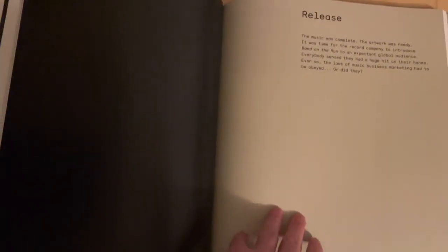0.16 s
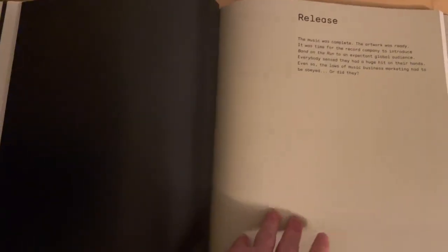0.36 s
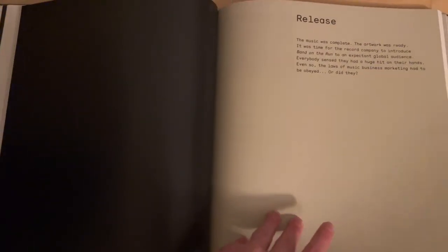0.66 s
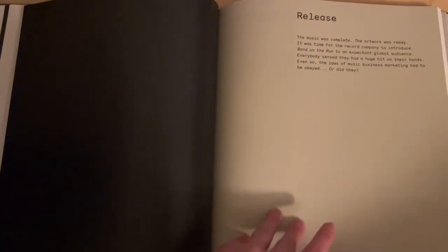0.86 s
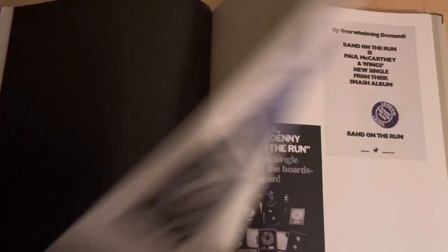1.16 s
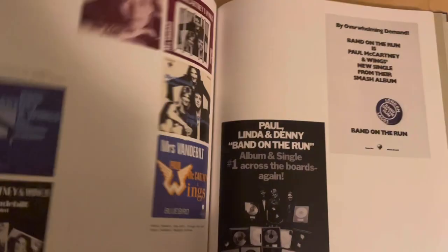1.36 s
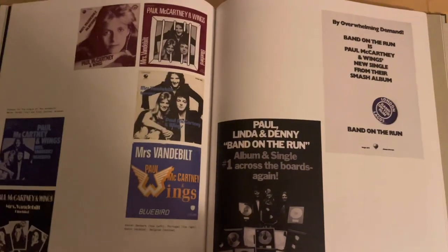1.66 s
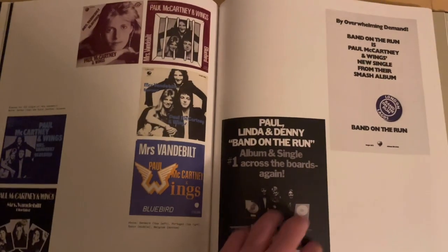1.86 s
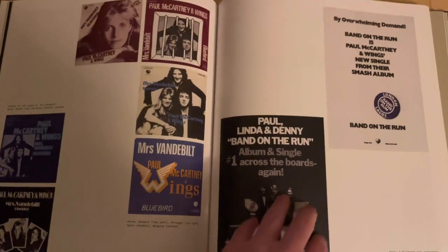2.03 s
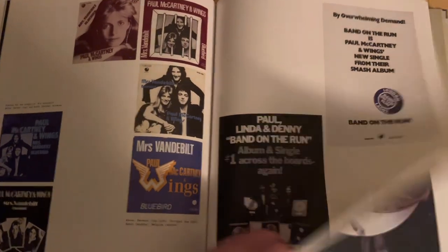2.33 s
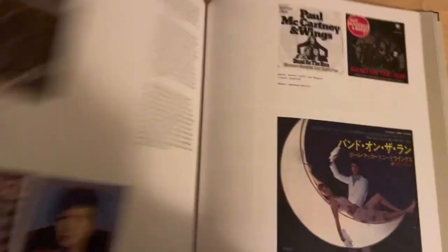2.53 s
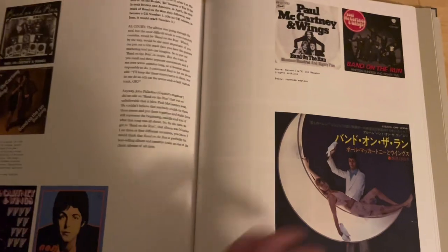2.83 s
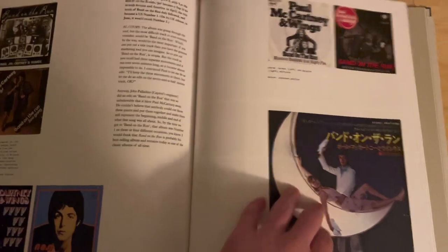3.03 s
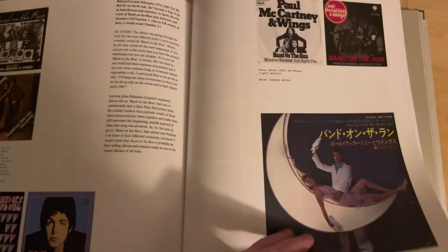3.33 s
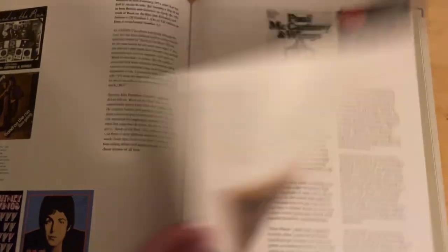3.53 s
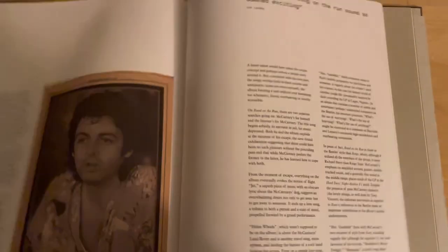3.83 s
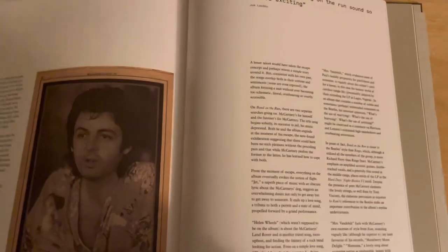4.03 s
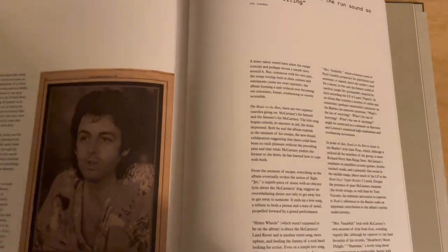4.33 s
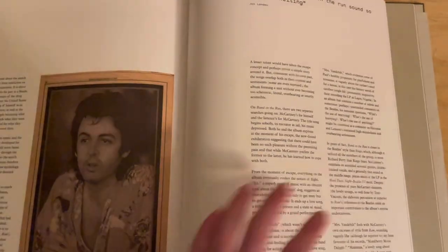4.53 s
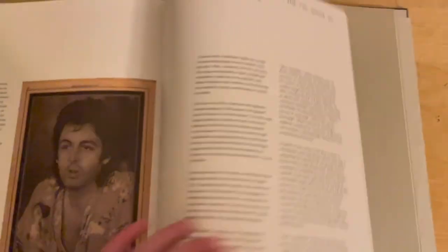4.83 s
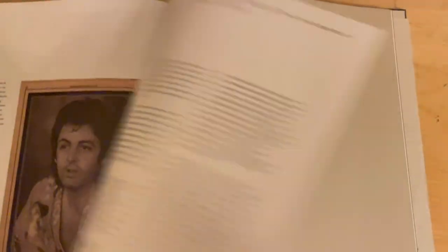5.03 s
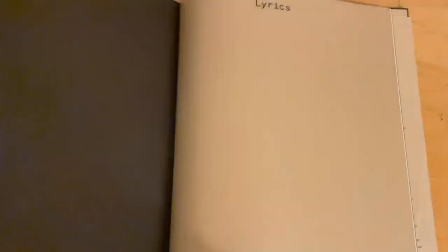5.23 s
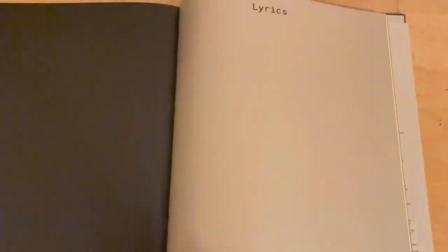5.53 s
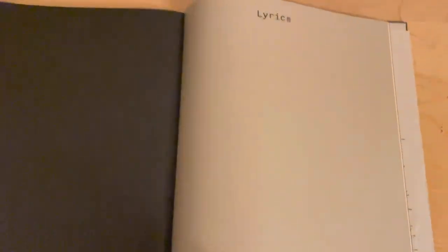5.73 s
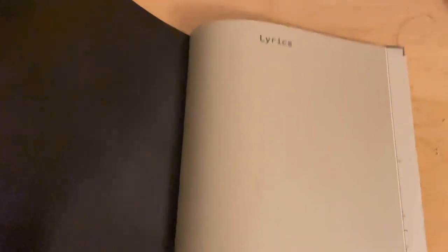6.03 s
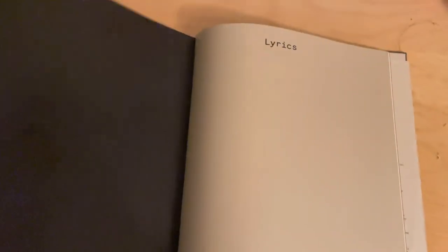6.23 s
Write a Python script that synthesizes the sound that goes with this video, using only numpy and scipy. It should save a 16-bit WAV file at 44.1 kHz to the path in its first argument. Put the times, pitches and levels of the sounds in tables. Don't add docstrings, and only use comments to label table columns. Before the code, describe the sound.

Close indoor page turning: thick paper hisses and scrapes, flutters, snaps and lands dully, with a sharp edge flick and quiet pauses between.

```python
import sys
import numpy as np
from scipy import signal
from scipy.fft import rfft, irfft, next_fast_len
from scipy.io import wavfile
from scipy.ndimage import uniform_filter1d, map_coordinates

SR = 44100
rng = np.random.default_rng(int(sys.argv[2]) if len(sys.argv) > 2 else 0)


def gain_from_db(level_db):
    decades = np.asarray(level_db, float) / 20
    return 10 ** decades


def digitize_waveform(pressure):
    field = np.atleast_2d(pressure).T
    bounded = np.clip(field, -1, 1)
    quanta = np.round(bounded * 32767).astype(np.int16)
    wavfile.write(sys.argv[1], SR, quanta)


N = 281358

# [f/Hz, density level/dB]
AIR_COLOUR = [(15, -41.5), (30, -1.5), (87, -1), (240, -17), (600, -27), (5880, -40), (10400, -41.5),
              (16000, -54)]
TABLE_COLOUR = [(12, -58.5), (20, -14.5), (49, 0), (123, 0.5), (140, 4.5), (173, -8), (260, -13),
                (340, -32.5), (570, -120)]
HISS_COLOUR = [(1500, -33.5), (2800, -7.5), (4000, -2.5), (7000, -2.5), (11000, -10), (14300, -22),
               (15500, -26.5), (16000, -34.5)]
SCRAPE_COLOUR = [(500, -27), (1100, -3), (2000, -0.8), (3200, -3), (6000, -40)]
CRACK_COLOUR = [(700, -31), (1500, -1), (2500, 1), (5000, -4.5), (7500, -2), (10000, -9.5), (13000, -16),
                (16000, -22)]
FLUTTER_COLOUR = [(150, -27), (280, 5.5), (1400, -6), (2400, -26)]
# [f/Hz, likeness -1..1]
AIR_ALIKE = [(60, 0.9), (290, 1), (640, -0.37), (3100, 0.3), (6820, -0.99), (15000, 0.51)]
GLOSS_ALIKE = [(2000, .8), (5500, .88), (7000, .92), (9000, .95), (11000, .9), (14000, .97)]
TABLE_ALIKE, SCRAPE_ALIKE, FLUTTER_ALIKE = [(60, 0.92)], [(1000, 0.5)], [(300, 0.8)]
# [f/Hz, lead/rad]
PORT_LEAD = [(0, 0), (3000, .3), (5100, -.1), (6000, -1.4), (7000, -2.6), (7800, -3.14), (8600, -3.8),
             (9900, -6), (12300, -6.5), (13000, -9.2), (14600, -9.5), (15100, -9.5), (15800, -10.4)]
# [f/Hz, t60/s]
ROOM_T60 = [(150, 0.21), (1000, 0.15), (4000, 0.19), (12000, 0.11)]
# [f/Hz, width/Hz, level/dB]
BLOCK_NOTES = [(1453, 160, 2.5), (2336, 270, -16)]
# [t/s, left over right level/dB]
LEAN = [(0, 0), (1.2, 2), (1.5, 4.5), (2.4, 4), (3.8, 4.5), (4.6, 1), (5.3, 5.5), (6.38, 4.5)]

# [peak t/s, level/dB, swell/s, fade/s]
PRESSES = [(0.0, -59.5, .05, 0.052), (.307, -61, 0.072, 0.077), (0.595, -51.5, 0.021, 0.15),
           (.76, -47, 0.13, 0.078), (.893, -58, 0.12, 0.33), (1.248, -57, 0.27, 0.12),
           (1.382, -56, .054, .2), (1.519, -42.5, 0.064, 0.072), (1.714, -47.5, 0.095, 0.14),
           (2.2, -50, 0.026, 0.13), (2.31, -51.5, 0.069, 0.078), (2.522, -46, 0.02, 0.15),
           (2.577, -48, 0.12, .115), (3.05, -50, 0.047, 0.065), (3.226, -50.5, 0.0068, 0.099),
           (3.552, -51.5, 0.038, 0.21), (3.689, -44.5, 0.043, 0.11), (3.814, -40.5, 0.04, 0.13),
           (4.2, -62, 0.085, 0.31), (4.65, -65, 0.17, 0.41), (5.068, -54, .05, 0.088),
           (5.23, -45, 0.046, 0.11), (5.323, -37, 0.1, 0.061), (5.44, -55, 0.12, 0.09),
           (5.83, -58, 0.021, .15), (5.939, -55, .06, 0.07), (6.107, -45.5, .06, 0.22),
           (6.173, -45, .1, 0.16), (6.378, -44.5, .07, 0.11)]
# [peak t/s, hiss level/dB, scrape over hiss/dB, swell/s, fade/s]
SLIDES = [(0.308, -74, 3, 0.048, 0.031), (.731, -60.5, 0, 0.042, .085), (.86, -73.5, 5, .03, .15),
          (.975, -57, -1.5, 0.091, 0.13), (1.206, -60.5, 4.5, 0.32, 0.12), (1.39, -69, -2, .3, 0.25),
          (1.494, -54, 4, 0.049, 0.17), (1.579, -54.5, -9.5, 0.19, 0.073), (1.97, -66.5, -0.5, .12, 0.048),
          (1.87, -62, -0.5, 0.11, 0.075), (2.061, -65.5, 1, 0.018, 1), (2.479, -59.5, -0.9, 0.32, 0.12),
          (2.579, -59, 7.5, 0.32, 0.064), (2.784, -56, -8, 0.24, 0.12), (3.03, -62, 0, 0.026, 0.21),
          (3.12, -64, 3, .06, .1), (3.239, -56.5, -0.5, 0.15, 0.071), (3.375, -58.5, -1, 0.07, 0.3),
          (3.526, -52.5, -2, 0.085, .16), (3.67, -51, -4, 0.11, 0.17), (4.051, -66, 6, 0.46, 0.049),
          (4.29, -62, -1, 0.4, 0.057), (4.393, -69, -2.5, .2, 0.055), (5.1, -67.5, 2, .4, 0.11),
          (5.2, -68, -2, .015, .2), (6.32, -80, 16, 0.11, 0.43)]
# [t/s, hiss level/dB, scrape over hiss/dB, fade/s]
SKIDS = [(0.0, -75, -3, 0.145), (.68, -53.5, 5, 0.072), (1.703, -53.5, 1, 0.17), (2.182, -59, 18, 0.19),
         (2.517, -49.5, 7.5, 0.084), (3.798, -47.5, 14, 0.13), (4.598, -54.5, -7, 0.12),
         (4.74, -65.5, -4.5, 0.14), (5.272, -60, -8.5, 0.1), (5.325, -63, -13, 0.033),
         (5.819, -81, 8.5, 0.32), (6.06, -82.5, 19.5, 0.11), (6.124, -68.5, 17.5, 0.13)]
# start t/s, length/s, hiss level/dB, scrape over hiss/dB, pointedness
SWIPE = (4.59, 0.1638, -45, -7, 1.8)
# [peak t/s, level/dB, note f/Hz, swell/s, fade/s]
SWEEPS = [(0.0, -55.5, 460, .02, 0.026), (.75, -53, 650, .08, 0.021), (1.05, -58.5, 700, .5, 0.54),
          (1.2, -56, 900, .11, 0.029), (1.87, -61, 686, .4, 0.077), (2.09, -63, 573, .125, 0.063),
          (2.188, -38.5, 700, .022, 0.083), (2.56, -38, 450, 0.1, 0.1), (2.775, -60, 1080, .3, 0.027),
          (3.038, -59.5, 490, .083, 0.16), (3.225, -52.5, 740, .015, 0.17), (3.552, -51.5, 700, .14, 0.21),
          (3.69, -42, 600, 0.026, 0.07), (3.95, -61, 716, .2, 0.41), (4.269, -56.5, 916, .3, 0.12),
          (4.62, -65.5, 520, .04, .4), (4.925, -60, 720, 0.18, 0.163), (5.066, -53.5, 797, .13, 0.057),
          (5.93, -65, 594, .3, 0.057), (6.3, -57.5, 510, .3, 0.17), (6.378, -49, 564, .05, .1)]
# [t/s, length/s, level/dB, start f/Hz, end f/Hz]
WEDGES = [
    (2.6, .09, -48, 520, 470),
    (2.63, .11, -59, 1000, 1150),
    (2.74, .06, -57, 950, 1150),
    (2.68, .2, -65, 4100, 4800),
    (2.65, .2, -66, 2600, 2400),
    (4.81, .06, -64, 800, 700),
    (4.885, .12, -60, 800, 620),
    (4.91, .08, -71, 2050, 2000),
    (4.89, .09, -73, 4800, 5100),
    (5.03, .1, -71, 6000, 5000),
]
# [t/s, length/s, level/dB, start f/Hz, end f/Hz]
GAPS = [
    (4.81, .07, -71, 3000, 4000),
    (4.885, .06, -69, 3600, 3400),
    (5.04, .1, -66, 2000, 2200),
    (5.32, .11, -58, 1700, 1400),
    (6.255, .16, -65, 3200, 4400),
]
# [peak t/s, level/dB, start f/Hz, end f/Hz, swell/s, t60/s]
SQUEAKS = [
    (1.2, -33.5, 780, 1000, 0.013, 0.0087),
    (5.41, -68, 3730, 3480, .004, 0.018),
]
# [peak t/s, level/dB, swell/s, resonances [f/Hz, width/Hz, level/dB]]
FLICKS = [
    (2.1784, -17.5, 0.0017, [(1090, 150, -13.5), (1454, 44, -9.5), (2197, 330, 3.5), (2713, 51, -8.5), (3950, 270, -20.5), (4807, 160, -6.5), (5400, 150, -17.5), (6370, 180, -11), (6710, 150, -24.5), (7520, 160, -15)]),
    (3.2265, -39, 0.0035, [(623, 41, -5), (1704, 70, 5.5), (2070, 210, 3), (1060, 82, -6.5)]),
]
# [t/s its note
# arrives, peak level/dB, note f/Hz, spread/s]
WHIPS = [(.98, -56, 3000, .001), (1.476, -41, 800, .006), (1.75, -54, 3000, .001), (2.483, -44, 560, .008),
         (2.497, -47, 190, .02), (2.518, -27, 700, .004), (2.601, -32, 520, .006), (2.621, -40, 480, .01),
         (2.641, -42, 500, .01), (2.675, -42, 900, .006), (2.766, -46, 1150, .004), (3.05, -47, 140, .03),
         (3.542, -46, 330, .01), (3.68, -31, 650, .008), (3.687, -30, 270, .014), (3.8, -26, 300, .008),
         (3.796, -18, 620, .005), (3.808, -29, 1100, .005), (5.063, -45, 1500, .003),
         (5.263, -34, 520, .006), (5.268, -38, 2200, .002), (5.275, -21, 800, .005),
         (5.318, -24, 700, .004), (5.321, -34, 1500, .002), (6.144, -22, 800, .003),
         (6.212, -58, 4200, .001), (6.263, -50, 600, .004), (6.367, -31, 620, .01)]
# [t/s, peak level/dB, sheet note f/Hz, crack over peak/dB]
RIFFLES = [(.292, -51.5, 626, -15.5), (.495, -62, 530, -23), (.775, -56, 495, -18), (.851, -46, 495, -8),
           (.879, -45, 560, -11), (1.201, -33.5, 1180, -12.5), (1.486, -35.5, 570, -8.5),
           (1.505, -31.5, 444, -42), (1.696, -38.5, 488, -14.5), (2.284, -50, 390, -.5),
           (2.479, -54, 640, -14), (2.747, -48, 1000, -9.5), (4.169, -50, 760, -7.5),
           (5.062, -47, 1004, -24), (5.313, -31, 650, -30), (5.817, -43, 527, -20.5),
           (5.853, -47.5, 570, -19.5), (5.878, -46, 593, -22), (6.039, -49, 573, -31.5),
           (6.055, -44.5, 613, -32), (6.066, -43, 533, -30), (6.082, -38, 610, -27), (6.113, -34, 645, -25),
           (6.121, -24, 600, -30.5), (6.141, -32, 746, -20)]
FLAPS = [(.087, -59, 566, -22), (.589, -43.5, 597, -49), (.608, -56, 425, -23), (.669, -42.5, 534, -14.5),
         (1.379, -52.5, 386, -13), (1.493, -26, 730, -27.5), (2.564, -31, 503, -33), (2.595, -38, 525, -35),
         (3.677, -36, 430, -30), (3.804, -18, 850, -27), (3.814, -21.5, 509, -31.5),
         (5.199, -45.5, 358, -28), (5.213, -41, 363, -45), (5.237, -37, 526, -48), (5.266, -24, 560, -58),
         (5.291, -26.5, 534, -36.5), (5.424, -40, 448, -33), (5.924, -40.5, 542.5, -26),]
BUCKLES = [(.684, -38, 900, -9), (.719, -37.5, 565, -7.5), (.899, -38.5, 556, -11), (1.135, -37, 1040, -14),
           (1.427, -57, 530, 0.5), (1.468, -52, 704, -16), (1.535, -41, 450, -9), (1.632, -49.5, 520, -25),
           (1.709, -36.5, 500, -8), (2.515, -34, 546, -10), (3.534, -51, 540, -8), (3.794, -23, 440, -14),
           (3.949, -53.5, 525, -16), (4.274, -41, 837, -16), (6.336, -48, 565, -14), (6.358, -38, 578, -11)]
# [page block over peak/dB, later flutter over peak/dB, flutter fade/s]
SNAP_HABITS = [
    (-11.5, -12, 0.061),
    (-26, -9.5, 0.059),
    (-18, -9, .06),
]

AIR_DB, ROOM_DB = -71, -9
STROKE_DB = 20
MS_TIMES = np.arange(0, N / SR + .001, .001)
EDGE_TIMES = np.arange(-SR // 20, SR // 20) / SR


def unit(x):
    return x / np.sqrt(np.mean(x ** 2) + 1e-20)


def peak_one(x):
    return x / np.abs(x).max()


def along(points, hz):
    f, v = np.transpose(points)
    return np.interp(np.log(hz + 1), np.log(f + 1), v)


def wobble(rate):
    return map_coordinates(rng.standard_normal(int(N * rate / SR) + 4), [np.arange(N) * rate / SR])


def filtered(x, response):
    n = x.shape[-1]
    m = next_fast_len(n + 4096)
    return irfft(rfft(x, m) * response(np.fft.rfftfreq(m, 1 / SR)), m)[..., :n]


def resonance(f, hz, width):
    return 1j * f * width / (hz * hz - f * f + 1j * f * width)


def rush(spectrum, alike, rough_db=0, rate=100, patchy_db=None):
    def turn(hz):
        return np.arccos(np.clip(along(alike, hz), -1, 1)) / 2

    pair = rng.standard_normal((2, N)) * gain_from_db(rough_db * wobble(rate))
    if patchy_db:
        z = signal.stft(pair, nperseg=512)[2]
        field = uniform_filter1d(rng.standard_normal(z.shape[1:]), size=6, axis=0)
        field = uniform_filter1d(field, size=16, axis=1)
        pair = signal.istft(z * gain_from_db(patchy_db * unit(field)), nperseg=512)[1][:, :N]
    mid, side = filtered(pair, lambda hz: gain_from_db(along(spectrum, hz)) * [np.cos(turn(hz)), np.sin(turn(hz))])
    return unit(np.array([mid + side, mid - side]))


def sides(db):
    return gain_from_db([[db / 2], [-db / 2]])


def leaning(x):
    s, db = np.transpose(LEAN)
    lean_db = np.interp(np.arange(N) / SR, s, db)
    return x * gain_from_db([lean_db / 2, -lean_db / 2])


def lay(out, s, sound):
    out[round(s * SR):][:len(sound)] += sound


def swells(s, db, swell, fade, rounded=1):
    u = MS_TIMES - np.c_[s]
    away = np.where(u < 0, -u / np.c_[swell], u / np.c_[fade]) ** rounded
    return gain_from_db(2 * (np.c_[db] - STROKE_DB * away)) + 1e-15


def sampled(x):
    return np.interp(np.arange(N) / SR, np.arange(len(x)) / 1000, x)


def summed_db(*powers):
    return sampled(10 * np.log10(np.vstack(powers).sum(0)))


def all_snaps():
    kinds = zip((RIFFLES, FLAPS, BUCKLES), SNAP_HABITS)
    return sorted(row + habits for rows, habits in kinds for row in rows)


def tension():
    marks = np.zeros(N)
    marks[np.round(np.array(all_snaps())[:, 0] * SR).astype(int)] = 1
    lead = np.linspace(1, 0, SR // 60)[::-1] ** 0.66
    return np.clip(signal.fftconvolve(marks, lead)[len(lead) - 1:][:N], 0, 1)


def still_air():
    return gain_from_db(AIR_DB) * rush(AIR_COLOUR, AIR_ALIKE)


def room(x):
    hz, t, z = signal.stft(rng.standard_normal((2, SR // 2)), SR, nperseg=256)
    tail = signal.istft(z * gain_from_db(-60 * t / along(ROOM_T60, hz)[:, None]), SR, nperseg=256)[1]
    delayed = np.pad(x, (150, 0))[None]
    return signal.fftconvolve(delayed, tail / np.linalg.norm(tail[0]), axes=1)[:, :N]


def table_thuds():
    press_db = summed_db(swells(*np.transpose(PRESSES), 1.075))
    return gain_from_db(press_db - 0.53) * rush(TABLE_COLOUR, TABLE_ALIKE, rough_db=3.0, rate=22) * sides(.7)


def wedges(rows, width):
    out = np.zeros(N + SR)
    for s, length, db, start_hz, end_hz in rows:
        u = np.linspace(0, 1, round(length * SR))
        noise = rng.standard_normal((2, SR // 2))
        slow = filtered(noise, lambda f: 1 / (1 + (2 * f / (width * start_hz)) ** 2))
        a, b = slow[:, 2000:2000 + len(u)]
        phase = 2 * np.pi * np.cumsum(start_hz + (end_hz - start_hz) * u) / SR
        shape = np.abs(np.sin(np.pi * u ** .7)) ** .6
        lay(out, s, gain_from_db(db) * shape * unit(a * np.cos(phase) + b * np.sin(phase)))
    return out[:N] * sides(1.5)


def bending():
    lag, swell = 0.0062, 0.018
    s, db, hz, _, _, over, fade = np.transpose(all_snaps())
    s2, db2, hz2, swell2, fade2 = np.transpose(SWEEPS)
    after_snaps = swells(s + lag, db + over, swell + 0 * s, fade)
    power = np.vstack([after_snaps, swells(s2, db2, swell2, fade2)])
    notes = np.r_[np.clip(1.12 * hz, 420, 950), hz2]
    return summed_db(power), sampled(notes @ power / power.sum(0))


def flutter():
    level_db, note_hz = bending()
    notes = 320 * 1.36 ** np.arange(5)
    shake = rush(FLUTTER_COLOUR, FLUTTER_ALIKE, rough_db=3.5, rate=60)
    near = [np.exp(-(np.log(hz / note_hz) / 0.49) ** 2) for hz in notes]
    total = np.sqrt(sum(share ** 2 for share in near))
    sheet = 0
    for hz, share in zip(notes, near):
        sheet = sheet + share / total * unit(filtered(shake, lambda f: resonance(f, hz, 0.5 * hz) ** 2))
    return gain_from_db(level_db - 2.5 - 3.5 * tension()) * sheet * sides(1.0)


def rubbing():
    s, db, over, swell, fade = np.transpose(SLIDES)
    s2, db2, over2, fade2 = np.transpose(SKIDS)
    quick = 0.011 + 0 * s2
    start, length, swipe_db, swipe_over_db, pointed = SWIPE
    u = np.clip((MS_TIMES - start) / length, 0, 1)
    arch = (gain_from_db(swipe_db) * np.abs(np.sin(np.pi * u)) ** pointed)[None] ** 2
    hiss_db = summed_db(swells(s, db, swell, fade), swells(s2, db2, quick, fade2), arch)
    scrape_db = summed_db(swells(s, db + over, swell, fade), swells(s2, db2 + over2, quick, 0.57 * fade2),
                          arch * gain_from_db(2 * swipe_over_db))
    return hiss_db, scrape_db


def slides():
    hiss_db, scrape_db = rubbing()
    grip_db = 1.6 * wobble(35)
    tense = tension()
    hiss = rush(HISS_COLOUR, GLOSS_ALIKE, rough_db=1.5, rate=340, patchy_db=1.8) * sides(.2)
    scrape = rush(SCRAPE_COLOUR, SCRAPE_ALIKE, rough_db=2.0, rate=200, patchy_db=2.5) * sides(1.2)
    hiss_db = hiss_db + 0.35 - 1.7 * tense + grip_db
    scrape_db = scrape_db - 0.53 - 2.2 * tense + grip_db + 1.4 * wobble(30)
    return gain_from_db(hiss_db) * hiss + gain_from_db(scrape_db) * scrape


def crackle():
    per_s, over_hiss_db, spread_db = 700, -6, 7
    when, size = rng.random((2, N))
    sign = np.sign(when * 1e6 % 2 - 1)
    ticks = (when < per_s / SR) * gain_from_db(-spread_db * np.log(size + .03)) * sign
    bright = unit(filtered(ticks, lambda f: resonance(f, 4500, 7000) ** 2))
    return gain_from_db(rubbing()[0] + over_hiss_db) * bright * sides(.5)


def squeaks():
    out, u = np.zeros(N), EDGE_TIMES
    for s, db, start_hz, end_hz, swell, t60 in SQUEAKS:
        hz = end_hz + (start_hz - end_hz) * np.clip(-u / swell, 0, 1.5)
        phase = 2 * np.pi * np.cumsum(hz * (1 + 0.015 * wobble(623)[:len(u)])) / SR
        shape = np.where(u < 0, np.exp(-(u / swell) ** 2), gain_from_db(-60 * u / t60))
        lay(out, s + u[0], gain_from_db(db) * shape * (np.sin(phase) + 0.17 * np.sin(2 * phase)))
    return out * sides(0.47)


def flicks():
    out, u = np.zeros(N), EDGE_TIMES
    after = (u + np.sqrt(u * u + 0.00029 ** 2)) / 2
    for s, db, swell, peaks in FLICKS:
        rise = np.exp(-(np.minimum(u, 0) / swell) ** 2)
        ring = 0
        for k, (hz, width, level) in enumerate(peaks):
            ring = ring + gain_from_db(level - 37 * width * after) * np.cos(2 * np.pi * hz * u + 2.1 * k)
        grit = rng.standard_normal(len(u))
        scratch = unit(filtered(grit, lambda f: resonance(f, 2300, 5000) / (1 + (f / 7500) ** 8)))
        lay(out, s + u[0], -gain_from_db(db + 1.5) * rise * (ring + .12 * scratch * gain_from_db(-60 * after / 0.05)))
    return out * sides(2.1)


def whips():
    out, pad = np.zeros(N + SR), SR // 20
    for s, db, hz, spread in WHIPS:
        def travelled(f):
            late = np.exp(-2j * np.pi * spread * (2 * np.sqrt(hz * f) - f))
            return np.abs(resonance(f, hz, 1.3 * hz)) ** 3 * late / (1 + (f / (2.4 * hz)) ** 4)

        pulse = filtered(signal.unit_impulse(3 * pad, pad), travelled)
        lay(out, s - pad / SR, gain_from_db(db) * peak_one(pulse))
    return leaning(out[:N])


def snaps():
    out, t = np.zeros(N + SR), np.arange(SR // 14) / SR
    for s, db, hz, crack_db, block_db, *_ in all_snaps():
        shake, grit = rng.standard_normal((2, len(t)))
        u = t / np.clip(.0003 - .00008 * crack_db, .0004, .005)
        swing = 0.17 * np.sin(2 * np.pi * hz * t * (1 + 0.1 * np.exp(-u)))
        push = (shake + swing) * u * np.exp(-u)
        sheet = filtered(push, lambda f: resonance(f, hz, 1.21 * hz) ** 2 * resonance(f, hz, 0.77 * hz))
        block = filtered(push, lambda f: sum(gain_from_db(level) * resonance(f, c, w) ** 2 for c, w, level in BLOCK_NOTES))
        crack = unit(filtered(grit, lambda f: gain_from_db(along(CRACK_COLOUR, f))))
        crack = crack * gain_from_db(-60 * t / 0.017) * (1 - np.exp(-2.5 * u))
        whole = peak_one(sheet) + gain_from_db(block_db + 3.0) * peak_one(block) + gain_from_db(crack_db + 9) * crack
        lay(out, s, gain_from_db(db + 0.54) * whole)
    return leaning(out[:N])


def scene():
    sharp = squeaks() + flicks() + whips() + snaps()
    background = still_air() + gain_from_db(ROOM_DB) * room(sharp.mean(0)) + table_thuds()
    air = wedges(WEDGES, .22) + wedges(GAPS, .7) + flutter()
    return background + air + slides() + crackle() + sharp


def roll_off(x):
    return signal.sosfilt(signal.butter(12, 16100, fs=SR, output="sos"), x)


def record(dry):
    def ports(hz):
        lead = np.exp(.5j * np.outer([1, -1], along(PORT_LEAD, hz)))
        return lead * (hz < 16000) / (1 + (34 / (hz + 1)) ** 4)

    mix = filtered(dry, ports)
    return roll_off(mix)


dry = scene()
out = record(dry)
digitize_waveform(out)
```